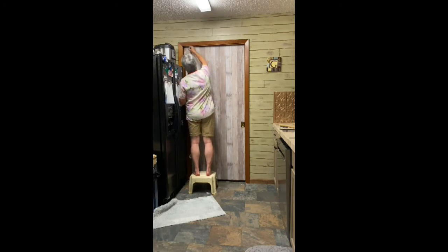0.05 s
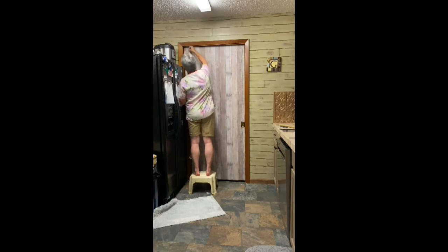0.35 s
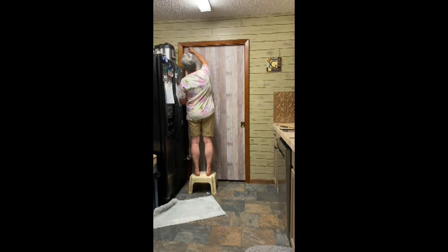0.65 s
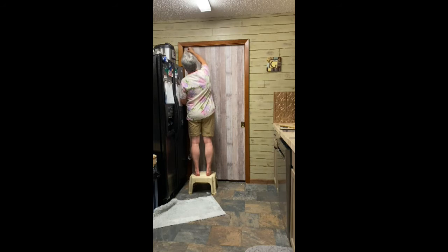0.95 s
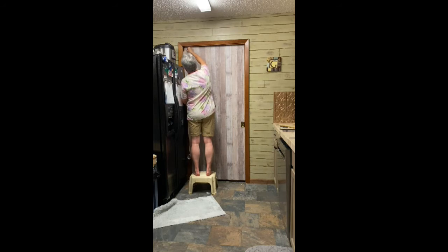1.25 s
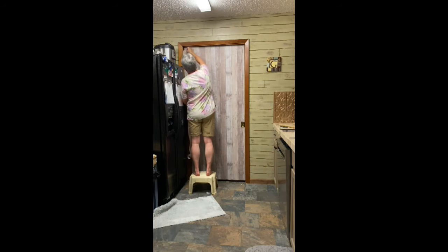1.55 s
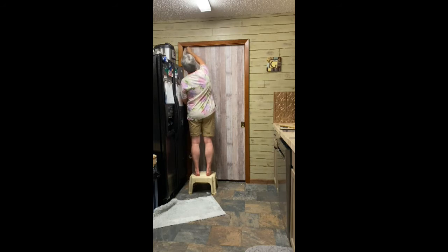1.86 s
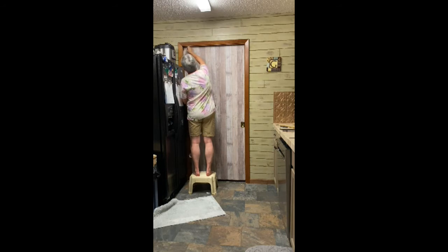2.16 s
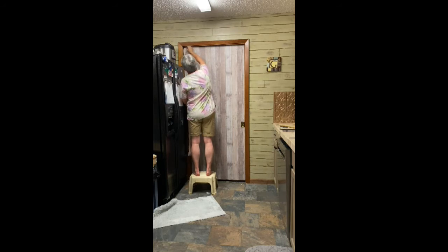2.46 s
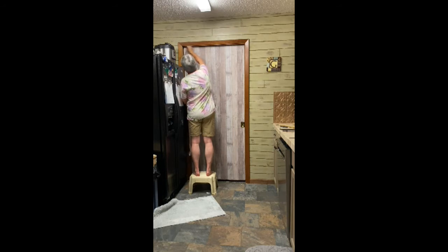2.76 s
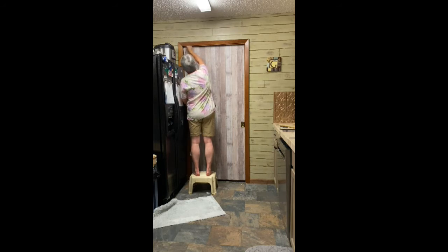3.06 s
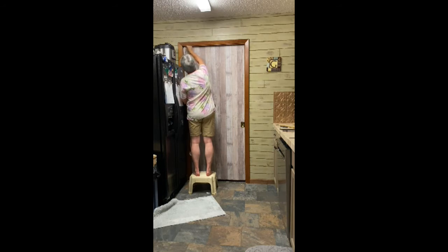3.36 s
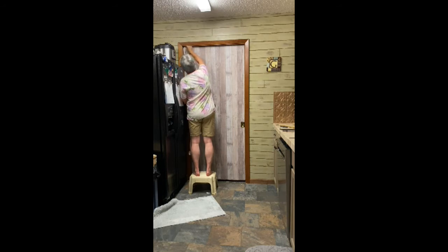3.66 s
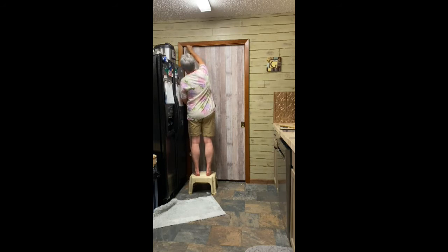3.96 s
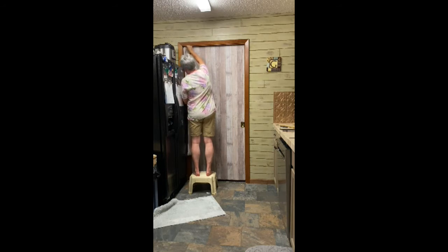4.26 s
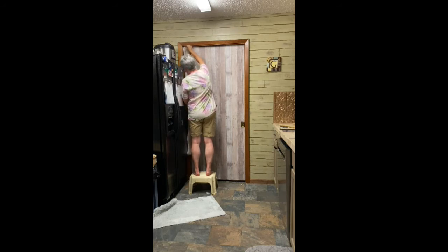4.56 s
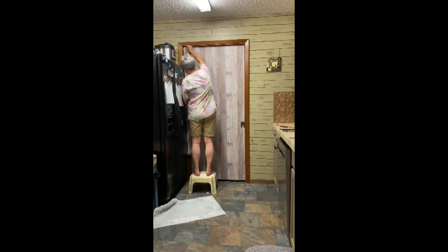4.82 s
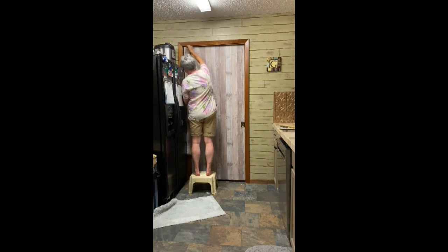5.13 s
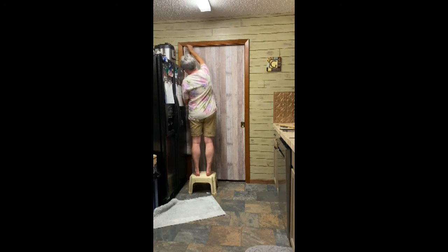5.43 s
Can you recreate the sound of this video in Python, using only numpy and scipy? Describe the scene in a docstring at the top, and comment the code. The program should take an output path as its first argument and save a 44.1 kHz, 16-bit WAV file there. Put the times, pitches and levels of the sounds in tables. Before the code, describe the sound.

Hands rub sticky vinyl onto a hollow door, with faint hisses, crackles, one sharp knock and a few dull booms.

```python
"""A brief hiss and a sharp knock, then hands go on smoothing sticky vinyl onto a hollow door.
The palm hisses as it slides over the film, and judders and squeaks where it grips. Creases crackle,
the door knocks in its frame and booms when leaned on, and the loose sheet brushes against it.
A refrigerator hums underneath. A phone hears it all from about three metres away in a small kitchen."""
import sys
import numpy as np
from scipy import signal
from scipy.fft import rfft, irfft
from scipy.io import wavfile

SR = 44100
rng = np.random.default_rng(int(sys.argv[2]) if len(sys.argv) > 2 else 0)


def output_pcm(signal):
    """Save a mono or channel-first signal as 16-bit PCM at the path in sys.argv[1].

    Samples are clipped to [-1, 1] before scaling.
    """
    pcm = np.clip(np.atleast_2d(signal).T, -1, 1) * 32767
    wavfile.write(sys.argv[1], SR, np.round(pcm).astype(np.int16))


N = 250929
T = np.arange(N) / SR

# The tone of skin hissing on the film. Each row: frequency in Hz, relative level in dB.
HISS_TONE = [(150, -22.5), (500, -25), (900, -11), (1700, -21.5), (2400, -11.5), (3200, -3), (4600, -4),
             (5800, -6), (7500, -2), (10000, -21.5), (15000, -31)]
# The tone of the flat palm's rasp. Each row: frequency in Hz, relative level in dB.
RASP_TONE = [(300, -21), (900, 3), (1200, 1), (1450, 3), (1900, -3), (2700, -1), (3400, -7.5), (6000, -9),
             (12000, -51)]
# The bright sheen of the film's raised pattern. Each row: frequency in Hz, relative level in dB.
SHEEN_TONE = [(4000, -40), (6500, -10), (8500, 0), (11000, -2), (13000, -2), (14500, -4), (16000, -9)]
# Strokes of the palm. Each row: start in seconds, length in seconds, hiss level in dB, swell in dB,
# offsets in dB for the rasp, the sheen and the loose film's ring, then that ring's pitch in Hz.
PALM_STROKES = [(-0.06, 0.47, -67.5, 3.5, 0, -5.5, -19, 1390), (0.287, 0.82, -74, -28.5, 1, -4, -3, 1340),
                (0.568, 0.3, -67.5, -5, -2.5, -4.5, -5.5, 1640),
                (0.96, 0.38, -68.5, 3.5, 2.5, -2.5, -7.5, 1930),
                (1.235, 0.032, -60, -7, -15, -5, 6.5, 5600), (1.445, 0.25, -80, 1.5, 7.5, -7, 1.5, 1600),
                (1.593, 0.079, -65, -5.5, -6.5, -6, -12, 1850), (1.724, 0.14, -75.5, -4, 7, 0, -18, 3160),
                (1.851, 0.11, -73, 4, 1, 4, -24, 3020), (1.975, 0.082, -65, 1, -4, 0, -14, 4400),
                (2.05, 0.094, -64, -6.5, -3.5, -7.5, -20, 4360), (2.192, 0.036, -65, 3, -33, -16, -8, 3550),
                (2.286, 0.09, -79, -1, -8, -7, -9, 3030), (2.424, 0.15, -75.5, -7, -7.5, -7.5, -7.5, 2900),
                (2.545, 0.13, -72, -2, -2.5, -10, -11, 3200), (2.75, .18, -83.5, 5, 0, -0.5, 1.5, 4380),
                (2.949, 0.11, -72.5, -6.5, 0, -32, -5.5, 3330), (3.344, 0.15, -86, -7, 4, -11, 5.5, 2860),
                (3.502, 0.05, -65.5, 5.5, -6.5, -10.5, -4.5, 3000),
                (3.703, 0.084, -72, 6, -4, -12.5, -2.5, 2120), (3.771, 0.13, -72, -1.5, -1, -3, -1, 4550),
                (3.9, 0.14, -71.5, -2, -3, -13.5, -5, 1750), (4.05, 0.2, -70, -2, -5.5, -8, -10, 1850),
                (4.255, 0.13, -73.5, -0.5, -7, -17, -9.5, 1960),
                (4.394, 0.15, -72.5, 4, -15, -12.5, -6.5, 4470), (4.534, 0.08, -75, 2.5, 1, -5, -4, 3930),
                (4.741, 0.079, -76.5, 0.5, 1.5, -7, -1.5, 2530),
                (4.917, 0.082, -73.5, -5, -3, -6, 2.5, 2520), (4.975, 0.16, -70, 3, -10.5, -12, -4, 4435),
                (5.141, 0.2, -74, 3, -6, -10, -8, 3130), (5.321, 0.15, -70.5, -3, -4.5, -7, -0.5, 2500),
                (5.464, 0.072, -60, -3, -18, -1.5, -1, 5000),
                (5.543, 0.14, -65.5, -4.5, -5.5, -10.5, -23, 3700)]

def sliding_palm(rasp_db=-1.5, crinkle_db=-3, resting_db=(-94.5, -86.5, -100)):
    """Skin hisses on the film, rasps when flat, adds a sheen when light and rings the loose part."""
    power = undb(resting_db)[:, None] ** 2 * np.ones(N)  # the hand never lies quite still
    flicker = undb(wander(54))

    def rubbing():
        """Smooth friction noise with tiny creases in it."""
        noise = rng.standard_normal(N)
        return unit(noise + undb(crinkle_db) * grains(per_s=700, spread_db=2.5)) * flicker

    hiss, rasp, push = rubbing(), rubbing(), rubbing()
    loose_film = np.zeros(N)
    for start, length, db, swell, rasp_rel, sheen_rel, ring_rel, hz in PALM_STROKES:
        attack_s = 0.033 + 0.13 * length  # long strokes start more gently
        stroke = undb(db) * gesture(start, length, swell, attack_s, release_s=0.045)
        power += np.outer(undb([0, rasp_rel, sheen_rel]) ** 2, stroke ** 2)
        loose_film += undb(ring_rel) * stroke * unit(resonate(push, hz))
    hiss_gain, rasp_gain, sheen_gain = np.sqrt(power)
    hiss = colour(hiss, HISS_TONE) * hiss_gain
    rasp = colour(rasp, RASP_TONE) * rasp_gain * undb(rasp_db)
    flicked_ridges = unit(rng.standard_normal(N) + grains(per_s=2000, spread_db=2))
    sheen = colour(flicked_ridges, SHEEN_TONE) * flicker * sheen_gain
    return stuck_sheet(hiss + rasp) + loose_film + sheen


# Notes that the stuck-down sheet favours. Each row: pitch in Hz, middle level in dB.
SHEET_NOTES = [(1780, -5), (2500, -9), (3100, -9), (4500, -8), (5700, -10)]

def stuck_sheet(rub, swing_db=9, changes_per_s=11):
    """The moving hand frees and damps the sheet's notes, so the tone of the rubbing shifts."""
    return rub + sum(resonate(rub, hz) * undb(db + swing_db * np.tanh(wander(changes_per_s)))
                     for hz, db in SHEET_NOTES)


# The door panel's own notes. Each row: pitch in Hz, relative level in dB, seconds to fade by 60 dB.
PANEL_NOTES = [(277, -13, .4), (318, -6, .36), (356, -4, .42), (389, -6, .38), (424, 3.5, .27),
               (467, 1.5, .35), (505, -8, .36), (531, -7, .36), (618, -12, .4), (670, -11, .3),
               (707, -10, .3), (761, -12, .3), (799, -4, .33), (832, -9, .44), (886, -7, .33),
               (931, -16, .4), (1010, -16, .38), (1130, -18, .42), (1209, -16, .35), (1286, -17, .35),
               (1841, -15, .2), (2573, -22, .22)]
# How well the palm's jerks pass into the panel. Each row: frequency in Hz, relative level in dB.
PALM_TONE = [(120, 5.5), (300, -2.5), (370, 0), (425, -10.5), (490, -4), (560, -7.5), (690, 2), (800, -9),
             (1500, -10), (4000, -46)]
# Moments of hard grip. Each row: start in seconds, length in seconds, level in dB, swell in dB.
PALM_DRAGS = [(0.626, 0.045, -63, -1), (0.871, 0.087, -75, 2), (1.06, 0.092, -68, 1),
              (1.162, 0.12, -65.5, 6.5), (1.438, 0.32, -66, -0.5), (1.808, 0.13, -72, 10),
              (2.048, 0.13, -60.5, 6.5), (2.444, 0.051, -71, 5), (3.016, 0.035, -72, 0),
              (5.292, 0.07, -71, -7), (5.527, 0.071, -71.5, -12)]

def juddering_palm(ring_scale=0.17, jerk_db=-9):
    """The palm sticks and slips. Its jerks ring the panel, and the hand cuts that ringing short."""
    grip = sum(undb(db) * gesture(start, length, swell, attack_s=0.033, release_s=0.012)
               for start, length, db, swell in PALM_DRAGS)
    big_jerks = undb(jerk_db) * grains(per_s=60, spread_db=2.5)
    slips = unit(big_jerks + grains(per_s=1400, spread_db=1))
    panel = colour(ring(PANEL_NOTES, T[:SR // 2], ring_scale), PALM_TONE)
    return signal.fftconvolve(slips * grip, panel / np.linalg.norm(panel))[:N]


# Skin squeaks. Each row: start in seconds, length in seconds, level in dB, swell in dB, pitch in Hz.
SKIN_SQUEAKS = [(0.619, 0.061, -59.5, -4, 474), (1.069, 0.085, -67.5, -14, 474),
                (1.215, 0.088, -62.5, 0, 475), (1.54, 0.047, -66.5, -8, 487), (1.68, 0.057, -64, -2, 472)]

def squeaking_skin(pitch_wobble=0.018, flutter_db=2.5, octave_db=-16):
    """Sticking skin falls into step with the panel for a moment: a short hollow note that wavers."""
    out = np.zeros(N)
    for start, length, db, swell, hz in SKIN_SQUEAKS:
        phase = 2 * np.pi * np.cumsum(hz * (1 + pitch_wobble * wander(100))) / SR
        note = unit(np.sin(phase) + undb(octave_db) * np.sin(2 * phase))
        grip = gesture(start, length, swell, attack_s=0.022, release_s=0.018)
        out += note * undb(db + flutter_db * wander(70)) * grip
    return out


# The tone of a snapping crease. Each row: frequency in Hz, relative level in dB.
SNAP_TONE = [(200, -28), (900, -9), (1450, 0), (2400, -1), (4000, 0), (5800, -2), (9000, -13), (15000, -25)]
# A crease popping inside out. Each row: pitch in Hz, relative level in dB, seconds to fade by 60 dB.
POP_NOTES = [(1792, 3, 0.0029), (2500, -7, 0.0025)]
# Creases giving way. Each row: start in seconds, base level in dB, tick offset in dB,
# length in seconds, pop offset in dB.
CREASES = [(0.089, -33, -4, 0.027, -14), (0.3879, -32, -12.5, 0.017, 0), (0.611, -33, 3.5, 0.011, -2.5),
           (0.789, -40.5, 12.5, 0.013, -3), (1.218, -42, 5.5, 0.036, -19), (1.253, -31.5, 1.5, 0.026, -16),
           (1.606, -47, -9, 0.0067, -8), (2.072, -44.5, -6, 0.017, -15), (2.898, -51, 2, 0.022, -12),
           (2.979, -49, -30, 0.013, -12), (3.557, -41.5, -22, 0.011, -7), (4.128, -41, -33, 0.015, -5),
           (4.24, -52, -13, 0.0064, -20), (5.345, -42.5, -20, 0.038, -27), (5.502, -40.5, -12, 0.03, -15)]

def crackling_film(snap_db=-6, tick_db=-9, fizz_db=-11.5, fizz_s=0.03):
    """Creases snap and pop over, and the glue lets go with a bright tick that fizzes on."""
    snap, tick, pop = np.zeros((3, N))
    for start, db, tick_rel, length, pop_rel in CREASES:
        rise = length / 10
        add(snap, start, undb(db + snap_db) * burst(length / 2, rise))
        glue = burst(length / 2, rise) + undb(fizz_db) * burst(fizz_s, rise)
        add(tick, start, undb(db + tick_rel + tick_db) * glue)
        add(pop, start, undb(db + pop_rel) * ring(POP_NOTES, T[:SR // 10], step_gain=0.57))
    return colour(snap, SNAP_TONE) + colour(tick, SHEEN_TONE) + pop


# The panel's dull give when hit. Each row: pitch in Hz, relative level in dB, seconds to fade by 60 dB.
THUD_NOTES = [(423.7, 2, 0.041), (475, -6, 0.082), (631, -8.5, 0.14), (772, -7, 0.092)]
# The tone of the door hitting its frame. Each row: frequency in Hz, relative level in dB.
CLACK_TONE = [(50, -24), (120, -18), (220, -25.5), (300, -10.5), (420, -1.5), (500, 3), (570, -3.5),
              (660, 2), (830, 2.5), (1000, -0.5), (1250, -6), (2000, -11.5), (2800, -12), (4000, -17.5),
              (6000, -22.5), (9000, -32.5), (15000, -33.5)]
# Knocks. Each row: start in seconds, levels in dB of ring, thud and clack, clack's treble limit in Hz.
DOOR_KNOCKS = [(0.095, -68, -46, -29, 6050), (0.1, -53, -38, -16, 5500), (0.1057, -29, -18, -31.5, 2000),
               (0.134, -44.5, -27.5, -31, 1200), (1.787, -64, -46, -34.5, 755),
               (1.7947, -47, -35.5, -40.5, 550), (2.082, -60, -50, -42, 600), (2.135, -65, -45, -56, 590),
               (2.167, -68, -63, -59, 540), (2.445, -81, -60.5, -55, 496), (2.515, -71, -59, -53.5, 550),
               (3.557, -93, -83, -56, 5030)]

def knocking_door(contact_s=0.0031):
    """The door hits its frame and rebounds. Returns the wooden clack, and the panel's thud and ring."""
    clack, panel = np.zeros((2, N))
    t = T[:SR]
    ringing = ring(PANEL_NOTES, t, step_gain=0.9)
    thud = ring(THUD_NOTES, t, step_gain=0.83)
    blow = signal.unit_impulse(len(t)) * np.sqrt(SR / 1000)  # energy of 1 ms at full level
    for start, ring_db, thud_db, clack_db, cut_hz in DOOR_KNOCKS:
        soften = signal.butter(2, cut_hz, fs=SR, output="sos")
        add(clack, start, undb(clack_db) * signal.sosfilt(soften, blow))
        wood = undb(ring_db) * ringing + undb(thud_db) * thud
        add(panel, start, wood * (1 - np.exp(-t / contact_s)))
    return colour(clack, CLACK_TONE), panel


# The door's deep boom, the room's notes on either side of it, and the boom's higher notes, ringing in
# the door and the room. Each row: pitch in Hz, relative level in dB, seconds to fade by 60 dB.
BOOM_NOTES = [(59.36, -2.5, 0.8)]
ROOM_NOTES = [(51.46, 0.4, 1), (64.8, -6.5, 0.96)]
UPPER_BOOM_NOTES = [(90.5, -14, 0.25), (118.7, -8.5, 0.35), (174, -20.5, 0.24), (213.6, -16, 0.37),
                    (304, -25, 0.33)]
# The tone of the loose panel's rumble. Each row: frequency in Hz, relative level in dB.
RUMBLE_TONE = [(25, -16.5), (60, 1), (105, 11), (220, -1), (330, -11), (600, -13.5), (1200, -34),
               (4000, -66)]
# Soft shoves. Each row: start in seconds, level in dB, rise in seconds, multiplier for the fade times,
# offset in dB for the room's notes, offset in dB for the boom's higher notes and the rumble.
DOOR_SHOVES = [(0.104, -55, 0.012, 1.7, -15, 15.5), (1.802, -28.5, 0.029, 0.99, -35, -3.5),
               (2.129, -57, 0.0052, 0.68, -2.5, 14), (2.448, -31.5, 0.016, 0.95, -11.5, -4.5),
               (3.552, -60, 0.0066, 0.19, -5.5, 10.5), (3.965, -58.5, 0.0014, 0.48, -14, 16),
               (4.077, -45.5, 0.0036, 0.21, -8.5, 1.5), (4.808, -40, 0.014, 0.88, -14.5, -8)]

def booming_door(rumble_db=-1, rumble_s=0.13, upper_db=-3):
    """Weight comes onto the door: its boom throbs against the room's notes and the panel rumbles."""
    boom, rumble = np.zeros((2, N))
    t = T[:2 * SR]
    for start, db, rise, ring_scale, room_rel, upper_rel in DOOR_SHOVES:
        room = undb(room_rel) * ring(ROOM_NOTES, t, ring_scale, step_gain=1)
        upper = undb(upper_rel + upper_db) * ring(UPPER_BOOM_NOTES, t, ring_scale)
        notes = ring(BOOM_NOTES, t, ring_scale) - room + upper
        add(boom, start, undb(db) * notes * (1 - np.exp(-t / rise)))
        add(rumble, start, undb(db + upper_rel + rumble_db) * burst(rumble_s * ring_scale, rise))
    return boom + colour(rumble, RUMBLE_TONE)


# The tone of a scuff. Each row: multiple of its centre pitch, relative level in dB.
SCUFF_TONE = [(.1, -10), (.4, -11.5), (.7, -12.5), (.9, -3.5), (1.1, -4), (1.4, -10.5), (2.2, -15),
              (5, -25), (14, -69)]
# Scuffs. Each row: loudest moment in seconds, level in dB, half length in seconds, centre pitch in Hz.
SHEET_SCUFFS = [(1.657, -65, 0.042, 1920), (2.167, -77, 0.022, 614), (2.513, -80, 0.048, 657),
                (2.833, -75.5, 0.0094, 1480), (3.061, -69.5, 0.017, 1372), (3.568, -63.5, 0.011, 1000),
                (3.921, -73.5, 0.072, 1800), (4.303, -70, 0.019, 882), (5.008, -71.5, 0.03, 2150),
                (5.067, -73, 0.074, 960), (5.371, -61.5, 0.035, 920), (5.596, -66.5, 0.0235, 710)]

def scuffing_sheet():
    """The loose sheet brushes the door in short swells, pitched by the air pocket under it."""
    out = np.zeros(N)
    for peak_s, db, half_s, hz in SHEET_SCUFFS:
        tone = [(hz * ratio, gain) for ratio, gain in SCUFF_TONE]
        brush = colour(grains(per_s=2500, spread_db=4)[:SR], tone)
        swell = np.exp(-.5 * ((T[:SR] - .5) / half_s) ** 2)
        add(out, peak_s - .5, undb(db) * unit(brush) * swell)
    return out


# The refrigerator's steady notes. Each row: pitch in Hz, average level in dB.
FRIDGE_NOTES = [(59.2, -74.5), (118.4, -75.5), (120, -80.5), (177.6, -87), (360, -91), (479, -93)]

def fridge(waver_db=2):
    """Motor and mains hum each waver a little and throb slowly against each other."""
    hum = np.zeros(N)
    for hz, db in FRIDGE_NOTES:
        level = undb(db + waver_db * wander(2.7)) * np.sqrt(2)
        hum += level * np.sin(2 * np.pi * (hz * T + rng.random()))
    return hum


# The tone of the kitchen's air. Each row: frequency in Hz, relative level in dB.
AIR_TONE = [(20, -17), (40, -11), (60, 0.5), (85, -4), (115, -2.5), (160, -13.5), (220, -21.5), (400, -18),
            (650, -27.5), (1100, -27.5), (2000, -45.5), (5000, -41), (9000, -40), (16000, -48)]

def kitchen_air(level_db=-70.5):
    """Air makes a faint, low rush."""
    return undb(level_db) * colour(rng.standard_normal(N), AIR_TONE)


# How long the echo lasts. Each row: frequency in Hz, seconds to fade by 60 dB.
ECHO_TIMES = [(100, 0.74), (500, 0.42), (2000, 0.36), (6000, 0.26), (14000, 0.061)]
# How unlike the echo is at the two microphones. Each row: frequency in Hz, share from 0 to 1.
ECHO_WIDTH = [(60, 0.0044), (200, 0.33), (450, 0.1934), (800, 0.91), (1200, 0.19), (1600, 0.1),
              (3000, 0.49), (5000, 0.38), (8000, 0.0026), (15000, 0.0047)]

def in_kitchen(x, echo_db, build_s=0.00069):
    """Hard walls add a dense left and right echo to the direct sound; its treble dies first."""
    t = T[:SR * 3 // 4]
    common, opposed = rfft(rng.standard_normal((2, len(t))))
    hz = frequencies(t)
    width = np.clip(read_curve(ECHO_WIDTH, hz), 0, 1)
    pair = np.sqrt(1 - width) * common + np.sqrt(width) * opposed * np.array([[1], [-1]])
    octaves = 125 * 2. ** np.arange(8)
    tail = np.zeros((2, len(t)))
    for centre in octaves:
        band = read_curve(np.c_[octaves, octaves == centre], hz)
        tail += irfft(pair * band, len(t)) * fade(t, read_curve(ECHO_TIMES, centre))
    tail *= 1 - np.exp(-t / build_s)
    tail /= np.sqrt(np.sum(tail ** 2) / 2)
    echo = signal.fftconvolve(x[None], tail, axes=1)[:, :N]
    gain = undb(echo_db)
    return (x + gain * echo) / np.sqrt(1 + gain ** 2)


# Standing waves in the room favour the right side. Each row: frequency in Hz, left minus right in dB.
SIDE_BALANCE = [(60, 0), (120, -1.5), (220, -5), (380, -6), (700, -2.5), (1300, -0.5), (4400, -0.8),
                (8000, 0)]
# Nearby walls bend the arriving sound. Each row: frequency in Hz, extra lead on the left in radians.
WALL_BEND = [(250, 0), (450, 1.57), (700, 2.3), (1000, 1.9), (1400, 0.83), (2000, 0.16), (3000, 0.93),
             (4000, 0.027), (5000, 0.56), (5600, -0.046), (7500, 0.59)]

def two_microphones(mix, left_lead_samples=1.83):
    """Sound reaches the left microphone slightly sooner and the right one slightly louder."""
    left, right = rfft(mix)
    hz = frequencies(mix)
    lean = undb(read_curve(SIDE_BALANCE, hz) / 2)
    lead = 2 * np.pi * hz * left_lead_samples / SR + read_curve(WALL_BEND, hz)
    return irfft(np.array([left * lean, right / lean * np.exp(-1j * lead)]), N)


def gesture(start, length, swell_db, attack_s, release_s):
    """One hand move: it gets going, changes by swell_db over its length, and runs out."""
    t = T - start
    attack = np.sin(np.pi / 2 * np.clip(t / attack_s, 0, 1)) ** 2
    hold = undb(swell_db * (np.clip(t / length, 0, 1) - .5))
    return attack * hold * np.exp(-np.maximum(t - length, 0) / release_s)


def resonate(x, hz, sharpness=10):
    """The film rings along with the part of x near one pitch."""
    return signal.lfilter(*signal.iirpeak(hz, sharpness, fs=SR), x)


def ring(notes, t, ring_scale=1, step_gain=-1):
    """Fading notes, each weighted step_gain times the one before; ring_scale multiplies fade times."""
    return sum(step_gain ** k * undb(db) * np.sin(2 * np.pi * hz * t) * fade(t, t60 * ring_scale)
               for k, (hz, db, t60) in enumerate(notes))


def burst(decay_s, rise_s):
    """A dying spray of tiny contacts, with the energy of one millisecond at full level."""
    t = T[:SR // 2]
    x = rng.standard_normal(len(t)) * np.exp(-t / decay_s) * (1 - np.exp(-t / rise_s)) ** 2
    return x / np.linalg.norm(x) * np.sqrt(SR / 1000)


def grains(per_s, spread_db):
    """Random slips, mostly small and a few large."""
    slips = (rng.random(N) < per_s / SR) * rng.standard_normal(N)
    return unit(slips * undb(spread_db * np.minimum(rng.exponential(size=N), 4)))


def wander(per_s):
    """Glide between random values, typically of size 1."""
    knots = rng.standard_normal(2048)
    return np.interp(T * per_s, np.arange(len(knots)), knots)


def colour(x, tone, size=4096):
    """Filter x to the shape of a tone table; white noise keeps its power."""
    gains = undb(read_curve(tone, np.fft.rfftfreq(size, 1 / SR)))
    cepstrum = irfft(np.log(gains))
    cepstrum[1:size // 2] *= 2  # folded so the filter never rings ahead of a sound
    cepstrum[size // 2 + 1:] = 0
    response = irfft(np.exp(rfft(cepstrum)))
    return signal.fftconvolve(x, response / np.linalg.norm(response))[:len(x)]


def read_curve(points, hz):
    """Read between (Hz, value) rows, with octaves evenly spaced."""
    known_hz, value = np.transpose(points)
    return np.interp(np.log(np.maximum(hz, 1)), np.log(known_hz), value)


def frequencies(x):
    """The frequencies in the spectrum of x."""
    return np.fft.rfftfreq(x.shape[-1], 1 / SR)


def add(track, start_s, sound):
    """Mix a sound into the track."""
    start = max(int(start_s * SR), 0)
    track[start:start + len(sound)] += sound[:N - start]


def fade(t, t60):
    """Die away by 60 dB in t60 seconds."""
    return np.exp(-np.log(1000) * t / t60)


def undb(db):
    """Turn decibels into a multiplier."""
    return 10 ** (np.asarray(db) / 20)


def unit(x):
    """Scale to an average power of 1."""
    return x / np.sqrt(np.mean(x ** 2))


def scene():
    """Hands, film, door and refrigerator together in the kitchen."""
    clack, panel = knocking_door()
    hum, air = fridge(), kitchen_air()
    mix = in_kitchen(sliding_palm(), echo_db=-13.5)
    mix += in_kitchen(crackling_film(), echo_db=-4.5)
    mix += in_kitchen(scuffing_sheet() + air, echo_db=-8)
    mix += in_kitchen(juddering_palm() + squeaking_skin(), echo_db=-15.5)
    mix += in_kitchen(clack, echo_db=12)  # arrives mostly by way of the walls
    mix += in_kitchen(panel, echo_db=-16.5)
    mix += booming_door() + hum
    return two_microphones(mix)


def record(dry):
    """The phone cuts the treble above 15800 Hz."""
    return signal.sosfilt(signal.ellip(8, .2, 70, 15800, fs=SR, output="sos"), dry)


dry = scene()
out = record(dry)
output_pcm(out)
```